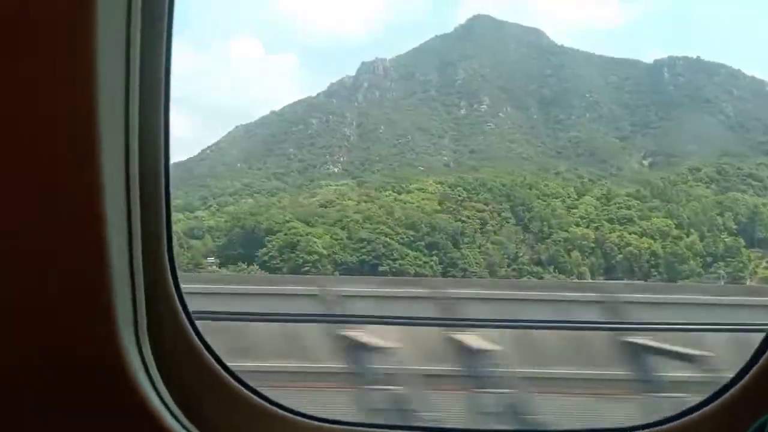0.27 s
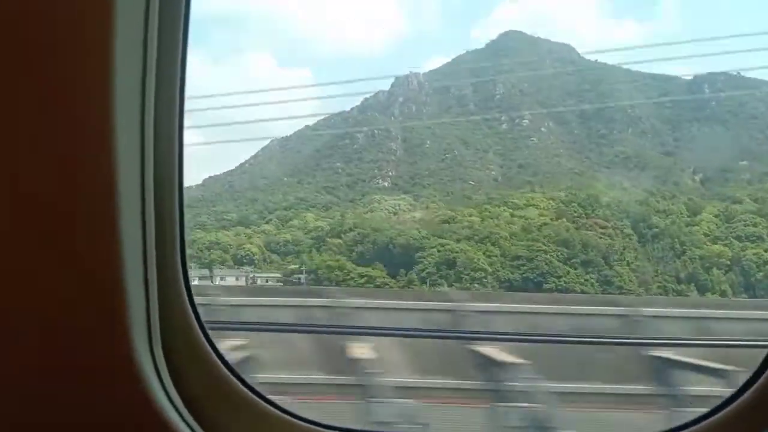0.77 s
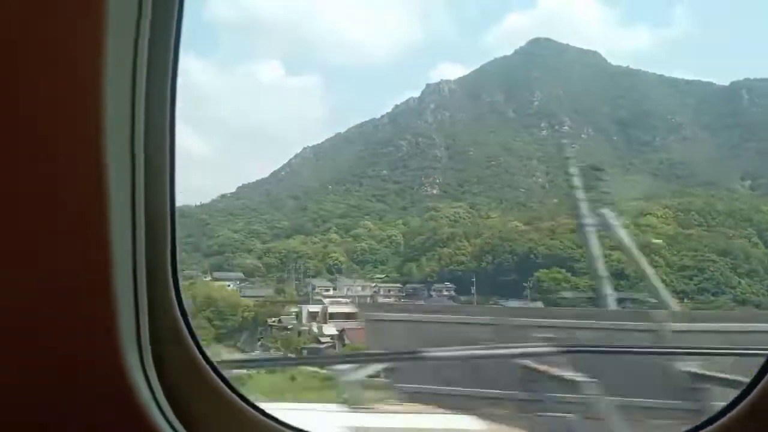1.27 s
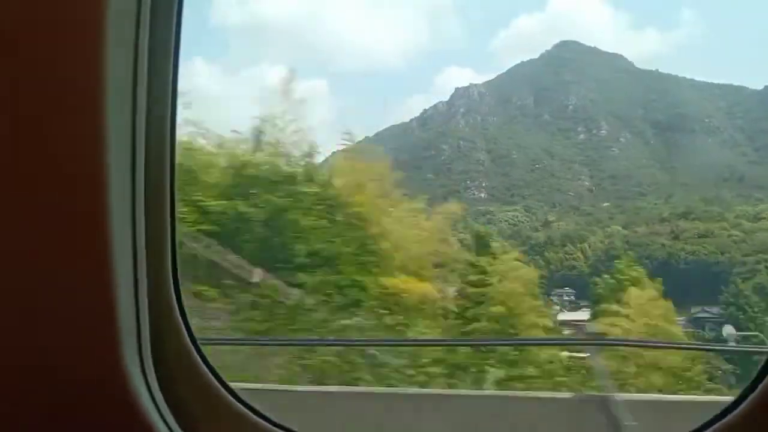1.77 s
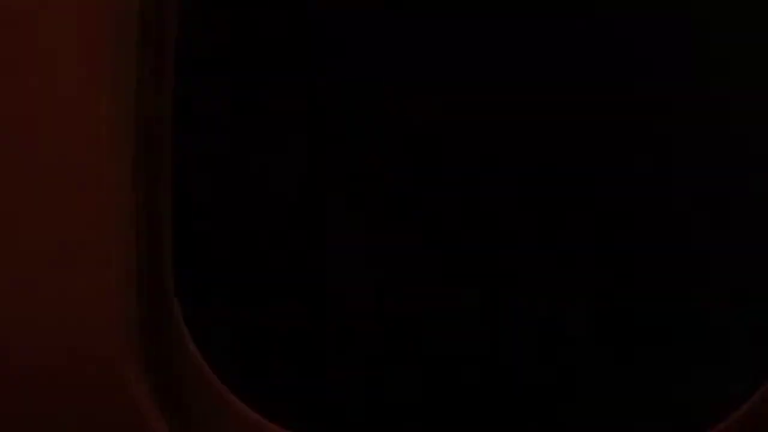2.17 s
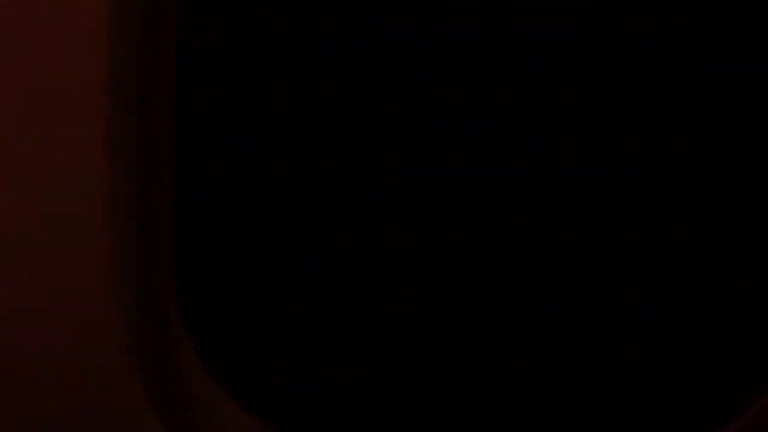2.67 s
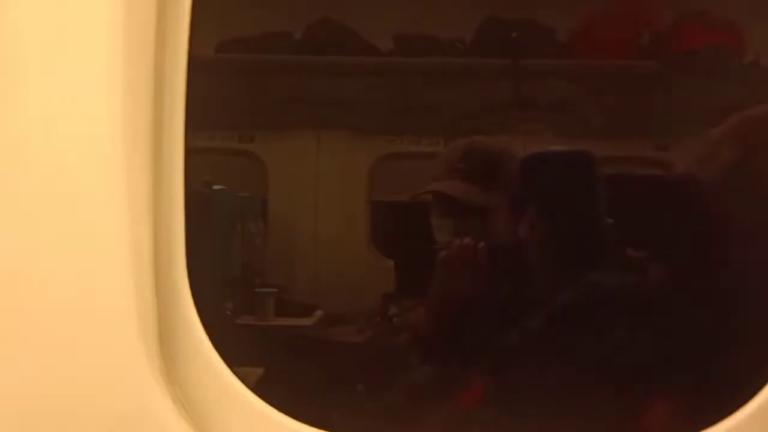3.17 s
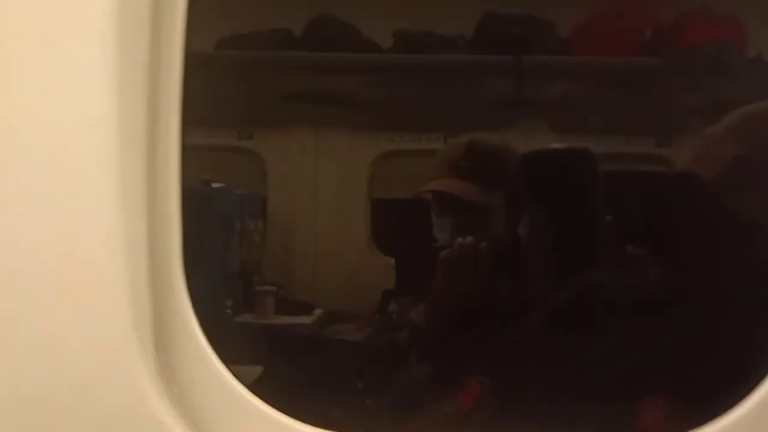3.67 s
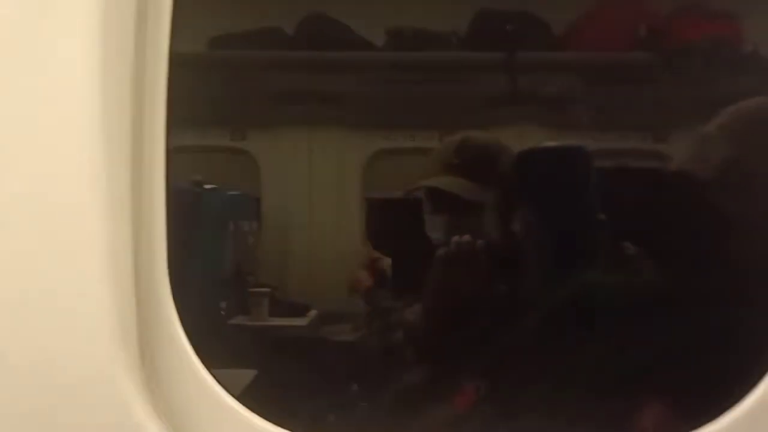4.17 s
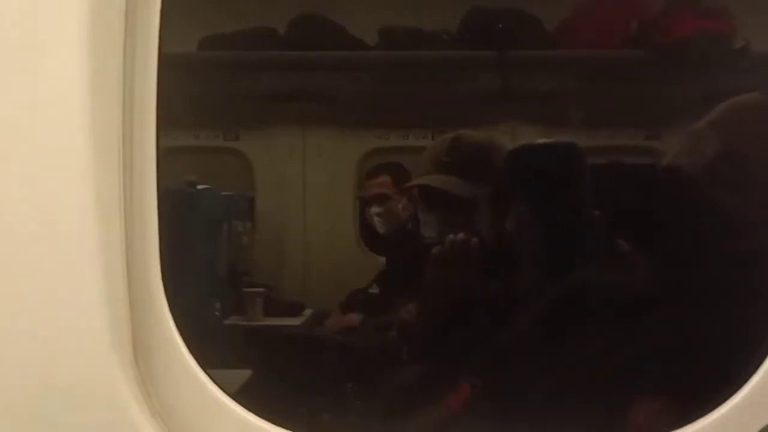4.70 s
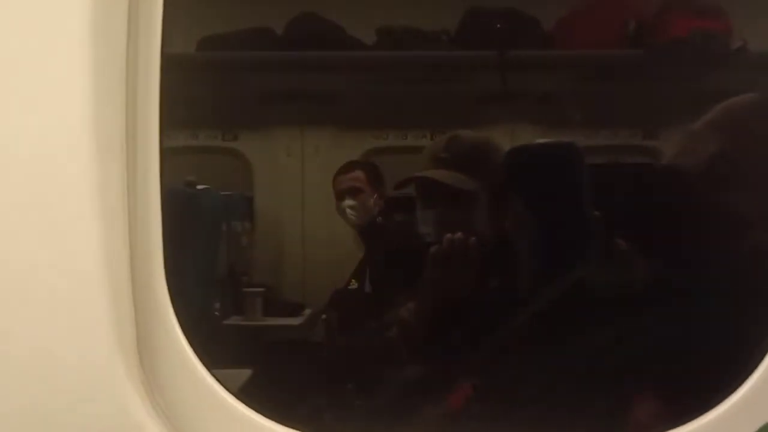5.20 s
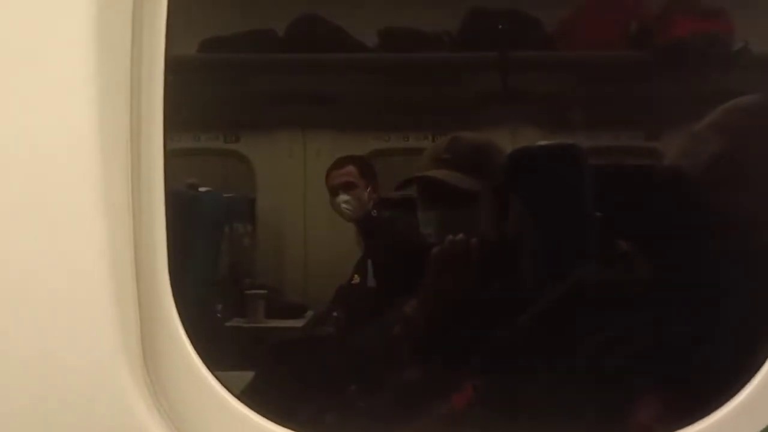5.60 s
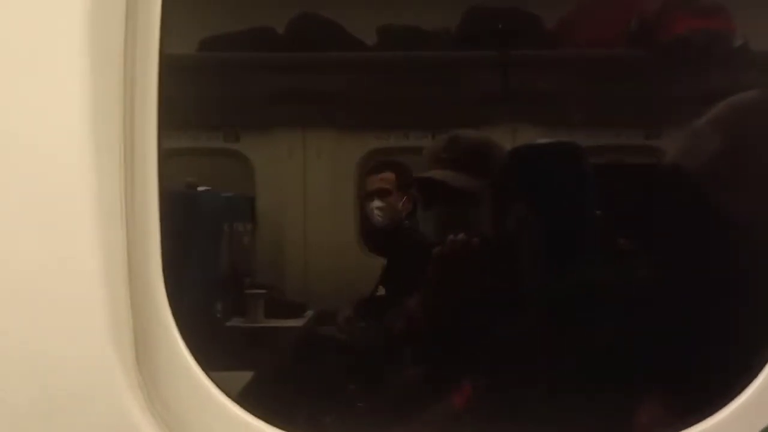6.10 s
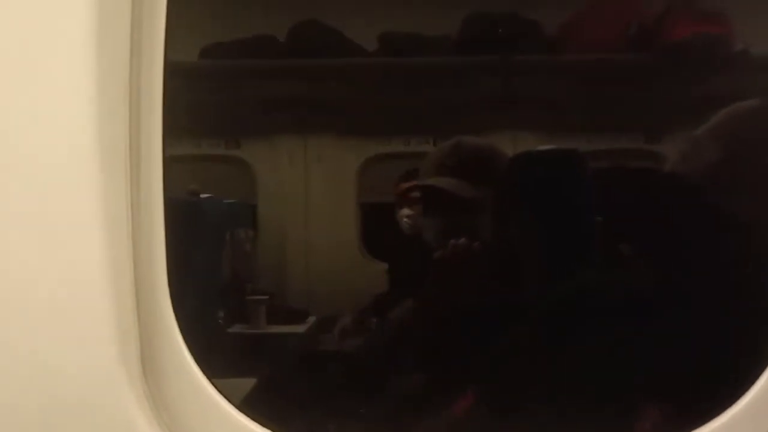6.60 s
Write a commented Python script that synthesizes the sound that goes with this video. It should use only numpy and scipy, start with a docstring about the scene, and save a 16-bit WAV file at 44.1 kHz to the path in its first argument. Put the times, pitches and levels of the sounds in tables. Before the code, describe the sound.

Steady low train-cabin drone and light clacks, then a rush of air at a tunnel mouth and a fuller, stronger roar continuing to the end.

```python
"""High-speed train into a tunnel

From a window seat, the car body booms, air roars along the skin and the wheels ring on the rails.
After two seconds the train enters a tunnel: air rushes at the mouth and the running noise grows louder.
Most sources are noise shaped by pitch and level; small knocks, clicks and rustles sound in the cabin.
A phone with two spaced microphones listens.
"""
import sys
import numpy as np
from scipy import signal
from scipy.fft import rfft, irfft
from scipy.io import wavfile
from scipy.ndimage import uniform_filter1d, map_coordinates

SR = 44100
rng = np.random.default_rng(int(sys.argv[2]) if len(sys.argv) > 2 else 0)


def to_wav(s):
    """Save 16-bit WAV."""
    ch = np.atleast_2d(s).T  # columns
    pcm = np.round(np.clip(ch, -1, 1) * 32767)  # PCM
    wavfile.write(sys.argv[1], SR, pcm.astype(np.int16))


N = 302078
TIME = np.arange(N) / SR  # seconds
FREQ = np.maximum(np.arange(N // 2 + 1) * SR / N, 1)  # Hz
PORTAL_S = 2.0  # the seat passes the mouth of the tunnel
COLOUR_BUILD_S = 0.17  # how fast the tunnel's colour takes over
JOLT_S = 0.037  # half length of a heave
TOP_HZ = 15500  # highest pitch the phone passes

# Colour of each source through the car body, relative to its own loudness: pitch_hz, level_db_per_hz
BOOM_COLOUR = [(20, -36), (35, -25.5), (45, -18), (56, -2), (63, -5.5), (72, 1), (84, -5.5), (92, 0.5)]
DRONE_COLOUR = [(98, 1), (108, -2.5), (121, -0.6), (134, 0.2), (153, -3.5), (168, -1.5), (190, -6),
                (215, -10.5)]
ROAR_OPEN_COLOUR = [(130, -31.5), (220, -4), (242, -3.5), (259, -3), (324, -6.5), (414, -9.5), (545, -14),
                    (583, -13), (773, -15.5), (930, -18.5), (1300, -26), (1690, -53), (2860, -120)]
ROAR_TUNNEL_COLOUR = [(130, -40), (220, -1), (265, -2), (399, -4.5), (549, -12.5), (605, -10),
                      (1040, -14.5), (1300, -23.5), (1690, -53), (2860, -120)]
WHEELS_OPEN_COLOUR = [(1300, 0.0), (1700, -3), (2100, -2.5), (2550, -2.5), (2900, -8), (3300, -14.5),
                      (4200, -18), (5000, -19), (6000, -25.5), (7500, -36.5)]
WHEELS_TUNNEL_COLOUR = [(1300, -6.5), (1550, -6), (1900, -5), (2250, -3), (2350, -2), (2550, -1.5),
                        (2850, -5), (3300, -14), (3800, -17), (4400, -22), (5100, -21), (5800, -27.5),
                        (6700, -34.5), (7500, -43.5)]
RUSH_COLOUR = [(150, -8), (260, 0), (450, -1.5), (700, -7), (1100, -12.5), (1500, -22.5), (2300, -23),
               (2850, -13.5), (3300, -24.5), (4200, -31), (5200, -34.5), (7500, -50.5)]  # air squeezed between train and tunnel mouth
HISS_COLOUR = [(7500, -3.5), (8800, -3), (10000, -9), (11500, -4.5), (13700, -4.5), (15300, -7.5)]
HANDLING_COLOUR = [(1000, -13.5), (1600, -8), (2200, -4), (2700, -2.5), (3300, -6.5), (3950, -7),
                   (4500, -2.5), (4900, -6), (5300, -1.5), (5850, -9.5), (6350, -7), (6900, -11.5),
                   (7400, -16.5), (11000, -19.5), (15000, -20.5)]

# How hard each source drives the cabin: open_db, tunnel_db, lag_after_portal_s, build_s, growth_db_per_s
FLOOR_LEVEL = (-29, -25, -0.05, 0.25, 0.17)
WALL_LEVEL = (-28.5, -22, -0.07, 0.06, 0.55)
ROAR_LEVEL = (-36.5, -26.5, 0.106, 0.24, 0.23)
WHEEL_LEVEL = (-52.5, -40, 0.19, 0.22, 0.0451)

# Rough spots in the track that heave the car body: time_s, floor_lift_db, wall_lift_db
TRACK_JOLTS = [(.69, 6, -3), (1.12, 0, 4), (1.4, 2, 6), (2.09, -2.5, 3), (2.27, 0.5, 3.5), (2.52, 6, 0.5),
               (2.99, 9, 0), (3.16, 5, 2), (3.7, 7, -0.5), (4.43, -1, 1), (4.92, 6, -2.5), (5.3, 7, -0.5),
               (5.55, 6, 0.5), (5.83, 0.5, 1), (6.21, 9.5, 2.5)]
# Slow swell of the running noise, shared by drone and roar: time_s, level_db
RUNNING_SWELL = [(0, 0.5), (.3, 0.5), (.6, -1.3), (1.12, 0.85), (1.8, -2), (2.25, -0.2), (2.85, -.5),
                 (3.65, -0.2), (3.95, -1), (4.2, 0.1), (4.6, 1.5), (5.1, -0.8), (5.7, 1.04), (6.25, -0.65),
                 (6.7, -1.1)]
# Rings of the running gear: pitch_hz, width_hz, open_db, tunnel_db
GEAR_RINGS = [(924, 62, -54.5, -61.5), (2528, 71, -68, -50.5), (2770, 100, -74.5, -57.5),
              (4930, 200, -79, -75)]
# Hard knocks of something like a tray or armrest: start_s, level_db, crack_db (relative to the knock)
HARD_KNOCKS = [(1.233, -46, -10), (1.386, -38.5, -3), (1.391, -39.5, -3), (1.461, -52, -10)]
# What the knocked part rings with: pitch_hz, level_db, time_to_fall_60_db_s
KNOCKED_PART_MODES = [(1750, -7, .04), (2280, -5, .07), (3270, -8, .025), (4200, -6, .03),
                      (5040, -6.5, .06), (5370, -10, .04), (6230, -11, .06), (6850, -12, .025),
                      (8400, -19, .02), (11400, -21, .02), (13600, -19, .015)]
# Small things handled: time_s, level_db, swell_s, fade_s, tilt_db_per_octave, raggedness_db, ring_hz
HANDLED_THINGS = [(.31, -46.5, .02, .03, -12.5, 2, 2200), (.398, -55, 0.0005, 0.0022, 0, 1, 12000),
                  (.618, -62, .001, 0.0018, 5, -1, 12000), (0.666, -52, .001, .003, -4, 1, 4500),
                  (.8, -56, .002, .008, -7, 0, 5200), (1.234, -44.5, 0.0075, 0.0081, -8, 1.5, 3900),
                  (1.252, -52, .002, .007, -3, 2, 4500), (1.380, -46, .0015, .004, -.5, 3, 5200),
                  (1.387, -37, 0.0018, 0.0069, -0.5, 2, 2250), (1.465, -48, .002, .005, -7, -2, 3000),
                  (2.53, -44, 0.013, 0.032, -6, 0.5, 4184), (3.513, -55, .001, 0.0025, 3, 0, 6300),
                  (4.797, -44.5, .002, .004, -2.5, -1, 4630), (5.477, -49, .012, 0.02, -3.5, 2, 5000),
                  (5.892, -43, 0.006, .014, -3, 1, 5930)]
# Thin, steady whines of the drive: pitch_hz, level_db
DRIVE_WHINES = [(1036, -59.5), (1095.5, -65.5), (1461.5, -71.5), (1826.8, -72), (2525.3, -71)]
# Cabin sound at the two microphones: pitch_hz, likeness (-1 to 1), left_lag_rad, left_minus_right_db
CABIN_FIELD = [(60, 1, 0.099, 0), (169, 0.99, 0.14, 0.1), (260, 0.87, 0.024, 1.6), (412, 0.98, 0.59, 2),
               (470, 0.7, 0.99, 5.5), (605, .3, 1.5, -3), (824, 0.13, 0.3, -2), (1145, 0.386, 0.69, -2.5),
               (1280, -0.43, 0.3, 1), (2000, -0.098, 0.88, -0.5), (3030, 0.17, .7, -0.5),
               (3550, -0.4, 0.024, 0), (4500, 0.16, 0, 0), (5500, 0, 0.25, -4.5), (7500, 0, 0, 0.5)]


def body_boom(floor_surge_db=1.0, wall_surge_db=1.0, approach_db_per_s=1.2):
    """Track roughness shakes the floor into a deep boom and the wall panels into a drone; both surge."""
    # the boom gathers on the way to the portal
    approach_db = approach_db_per_s * np.minimum(TIME - PORTAL_S, 0)
    floor_db = drive(*FLOOR_LEVEL) + approach_db + floor_surge_db * walk(5.4)
    wall_db = drive(*WALL_LEVEL) + swell() + wall_surge_db * walk(11)
    for time_s, floor_lift_db, wall_lift_db in TRACK_JOLTS:
        heave = np.exp(-((TIME - time_s) / JOLT_S) ** 2)
        floor_db = floor_db + floor_lift_db * heave
        wall_db = wall_db + wall_lift_db * heave
    boom = churn(BOOM_COLOUR) * undb(floor_db)
    drone = churn(DRONE_COLOUR) * undb(wall_db)
    return boom + drone


def air_roar(buffet_db=0.5):
    """Turbulent air scrubs the skin of the car and buffets it a little."""
    outside = cabin_noise(colour(ROAR_OPEN_COLOUR))
    inside = cabin_noise(colour(ROAR_TUNNEL_COLOUR))
    level_db = drive(*ROAR_LEVEL) + swell() + buffet_db * walk(6.8)
    return through_portal(outside, inside) * undb(level_db)


def wheels(flutter_db=0.17, waver_db=2.5, own_waver_db=1.4, drift=.006):
    """Rolling noise with narrow rings of wheels and gears, each wavering in level and pitch."""
    outside = cabin_noise(colour(WHEELS_OPEN_COLOUR))
    inside = cabin_noise(colour(WHEELS_TUNNEL_COLOUR))
    rolling_db = drive(*WHEEL_LEVEL) + flutter_db * walk(14)
    sound = through_portal(outside, inside) * undb(rolling_db)
    share = enclosed(COLOUR_BUILD_S)
    shared_waver_db = waver_db * walk(5.2)
    for hz, width_hz, open_db, tunnel_db in GEAR_RINGS:
        ring = cabin_noise(1 / (1 + ((FREQ - hz) / width_hz) ** 2))
        # reading the ring a little faster or slower bends its pitch
        clock = np.cumsum(1 + drift * walk(4))
        ring = np.array([map_coordinates(ear, [clock], mode="mirror") for ear in ring])
        level_db = open_db + (tunnel_db - open_db) * share
        sound = sound + ring * undb(level_db + shared_waver_db + own_waver_db * walk(15))
    return sound


def portal_rush(level_db=-31.5, lag_s=0.14, rise_s=0.15, fall_s=0.19):
    """A rush of squeezed air gathers as the portal nears, peaks just inside it and dies away."""
    since_peak = TIME - PORTAL_S - lag_s
    envelope = np.exp(np.minimum(since_peak / rise_s, -since_peak / fall_s))
    return cabin_noise(colour(RUSH_COLOUR)) * undb(level_db) * envelope


def knocks(crack_s=0.0008, bounce_s=.011, bounce_db=-9, bounce_loss_db=-2, pan_db=-2, count=5):
    """Each knock cracks and rings a hard plastic part, which chatters in uneven bounces that tend to weaken."""
    t = TIME[:SR // 4]
    out = np.zeros((2, N))
    for start_s, level_db, crack_db in HARD_KNOCKS:
        for bounce, (gap, size) in enumerate(rng.random((count, 2))):
            ring = np.zeros((2, len(t)))
            for hz, mode_db, t60 in KNOCKED_PART_MODES:
                phase = 2 * np.pi * rng.random((2, 1))
                ring += undb(mode_db - 60 * t / t60) * np.sin(2 * np.pi * hz * t + phase)
            crack = undb(crack_db) * np.exp(-t / crack_s) * rng.standard_normal((2, len(t)))
            # the first hit has full strength
            strength = 2 * size * undb(bounce_db + bounce_loss_db * bounce) if bounce else 1
            first = int(start_s * SR)
            out[:, first:first + len(t)] += undb(level_db) * strength * (ring + crack)
            start_s = start_s + bounce_s * (.5 + gap)
    return out * undb(np.array([[pan_db], [-pan_db]]) / 2)


def handling(tail_db=-11, tail_s=0.044, rattle=1.3, pan_db=-2, ring_db=7, ring_octaves=.2):
    """Short scrapes and clacks, each trailing off in a rustle; the ragged ones rattle as they die."""
    size = SR // 2
    hz = np.maximum(np.arange(size // 2 + 1) * SR / size, 1)
    shape = np.interp(hz, FREQ, colour(HANDLING_COLOUR))
    grip, chatter = walk(400), walk(160)
    out = np.zeros((2, N))
    for time_s, level_db, swell_s, fade_s, tilt_db, ragged_db, ring_hz in HANDLED_THINGS:
        first = int(time_s * SR) - size // 5  # leave room for the swell
        span = slice(first, first + size)
        before = np.maximum(time_s - TIME[span], 0)
        after = np.maximum(TIME[span] - time_s, 0)
        contact = undb(ragged_db * grip[span]) * np.exp(-after / fade_s)
        tail = undb(tail_db + rattle * ragged_db * chatter[span]) * np.exp(-after / tail_s)
        # the tilt sets the brightness, and each thing has a broad ring of its own
        ring_bump = np.exp(-(np.log2(hz / ring_hz) / ring_octaves) ** 2)
        tone_db = tilt_db * np.log2(hz) + ring_db * ring_bump
        noise = rfft(rng.standard_normal((2, size)))
        scrape = unit(irfft(noise * shape * undb(tone_db), size))
        envelope = np.exp(-before / swell_s) * np.hypot(contact, tail)
        out[:, span] += scrape * undb(level_db) * envelope
    return out * undb(np.array([[pan_db], [-pan_db]]) / 2)


def whine(width_hz=5):
    """Motors and gears sing faintly: narrow bands of noise at steady pitches."""
    lines = sum(undb(db) / (1 + ((FREQ - hz) / width_hz) ** 2) for hz, db in DRIVE_WHINES)
    total_level = np.sqrt(sum(undb(db) ** 2 for hz, db in DRIVE_WHINES))
    return cabin_noise(lines) * total_level


def hiss(open_db=-81.5, tunnel_db=-77, flicker_db=3.0):
    """A faint, flickering top hiss that grows only a little in the tunnel."""
    level_db = open_db + (tunnel_db - open_db) * enclosed(COLOUR_BUILD_S)
    return cabin_noise(colour(HISS_COLOUR)) * undb(level_db + flicker_db * walk(18))


def cabin_noise(gain):
    """Noise that fills the cabin: long waves reach both microphones alike, short ones differ."""
    likeness, lag, balance_db = over_pitch(CABIN_FIELD)
    likeness = np.clip(likeness, -.999, .999)
    mid, side = rfft(rng.standard_normal((2, N)))
    ear = np.array([[1], [-1]])  # left, right
    pair = np.sqrt(1 + likeness) * mid + ear * np.sqrt(1 - likeness) * side
    placed = pair * undb(ear * balance_db / 2) * np.exp(-.5j * ear * lag)
    sound = irfft(placed * gain, N)
    return sound / np.std(sound.mean(axis=0))


def churn(spectrum):
    """A rumble that churns quickly but holds its strength from moment to moment."""
    rumble = cabin_noise(colour(spectrum))
    strength = np.sqrt(uniform_filter1d(rumble[0] ** 2, size=7000))  # over about 0.16 s
    return unit(rumble / strength)


def enclosed(build_s, lag_s=0):
    """Share 0-1 of the tunnel's sound: the cars ahead enter first, so it swells in smoothly and settles."""
    return .5 + .5 * np.tanh((TIME - PORTAL_S - lag_s) / build_s)


def through_portal(outside, inside):
    """Hand over from the open-air sound to the tunnel's at even power."""
    share = enclosed(COLOUR_BUILD_S)
    return np.sqrt(1 - share) * outside + np.sqrt(share) * inside


def drive(open_db, tunnel_db, lag_s, build_s, growth_db_per_s):
    """Level of a source in dB: it swells around the portal and grows slowly along the way."""
    portal_db = open_db + (tunnel_db - open_db) * enclosed(build_s, lag_s)
    return portal_db + growth_db_per_s * (TIME - PORTAL_S)


def swell():
    """The slow swell of the running noise in dB at every sample."""
    return np.interp(TIME, *np.transpose(RUNNING_SWELL))


def walk(rate):
    """Smooth chance with spread 1 that changes about `rate` times a second."""
    return unit(irfft(rfft(rng.standard_normal(N)) * np.exp(-(FREQ / rate) ** 2), N))


def over_pitch(rows):
    """Each column of a spectrum at every frequency."""
    hz, *columns = np.transpose(rows)
    return [np.interp(np.log(FREQ), np.log(hz), column) for column in columns]


def colour(rows):
    """Gain of a spectrum, falling steeply beyond its ends."""
    octaves_below = np.maximum(np.log2(rows[0][0] / FREQ), 0)
    octaves_above = np.maximum(np.log2(FREQ / rows[-1][0]), 0)
    return undb(over_pitch(rows)[0] - 120 * (octaves_below + octaves_above))


def undb(db):
    """Decibels to gain."""
    return 10 ** (np.asarray(db) / 20)


def unit(x):
    """Scale to an average strength (rms) of 1."""
    return x / np.sqrt(np.mean(x ** 2))


def scene():
    """Everything heard from the seat."""
    running = body_boom() + air_roar() + wheels() + portal_rush()
    cabin = knocks() + handling()
    return running + cabin + whine() + hiss()


def record(dry):
    """The phone cuts the top with a steep low-pass filter."""
    top_cut = signal.ellip(10, .1, 80, TOP_HZ, fs=SR, output="sos")
    return signal.sosfilt(top_cut, dry)


dry = scene()
out = record(dry)
to_wav(out)
```